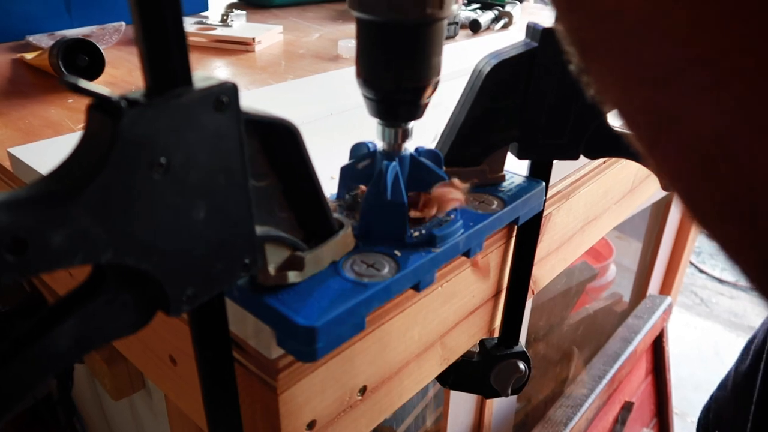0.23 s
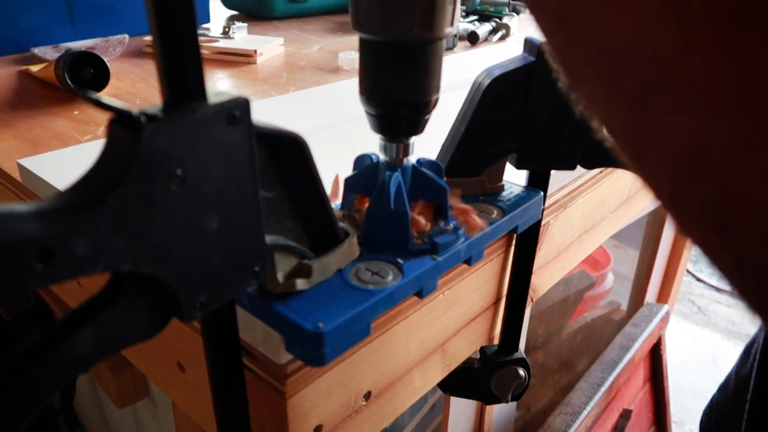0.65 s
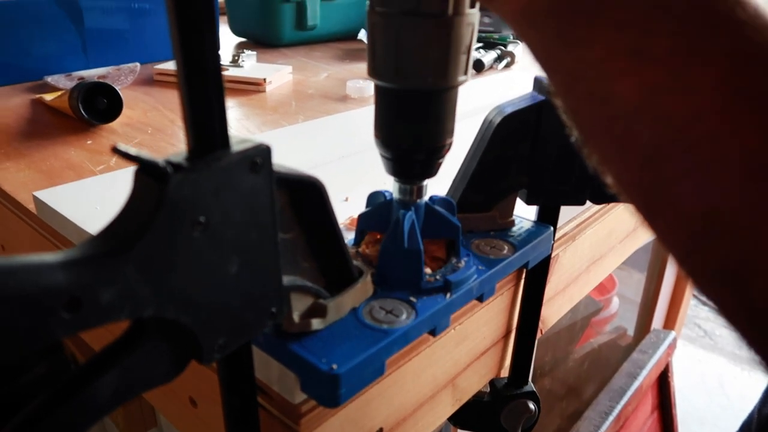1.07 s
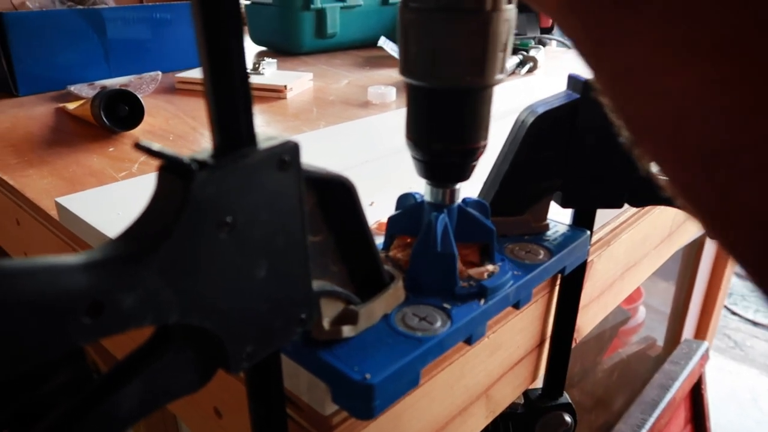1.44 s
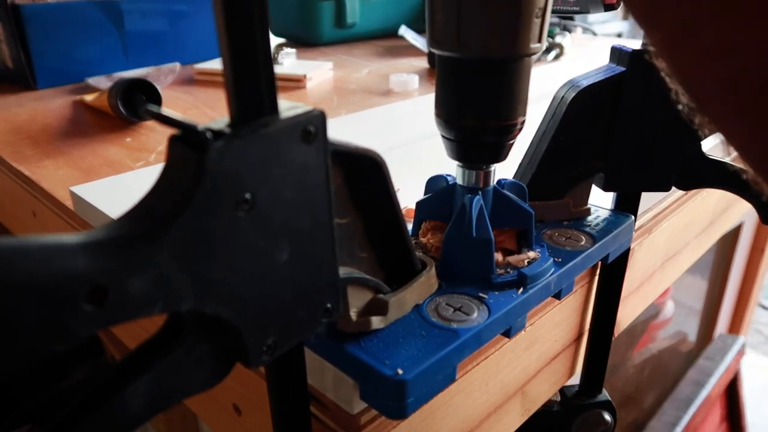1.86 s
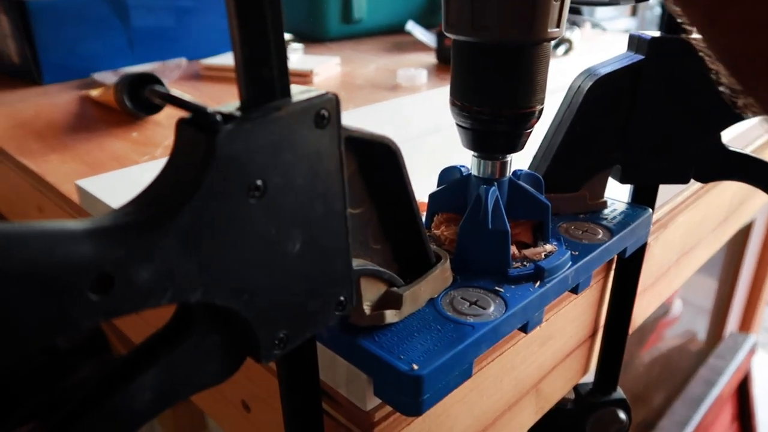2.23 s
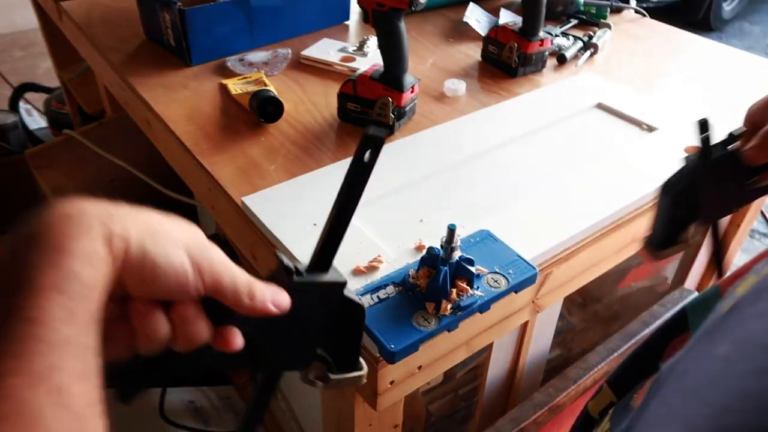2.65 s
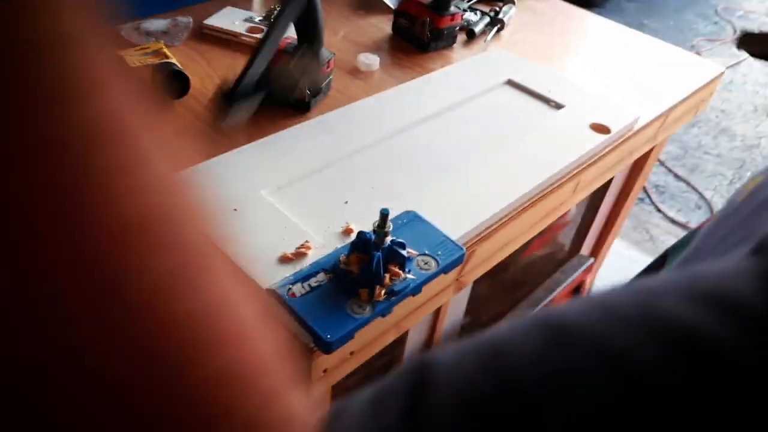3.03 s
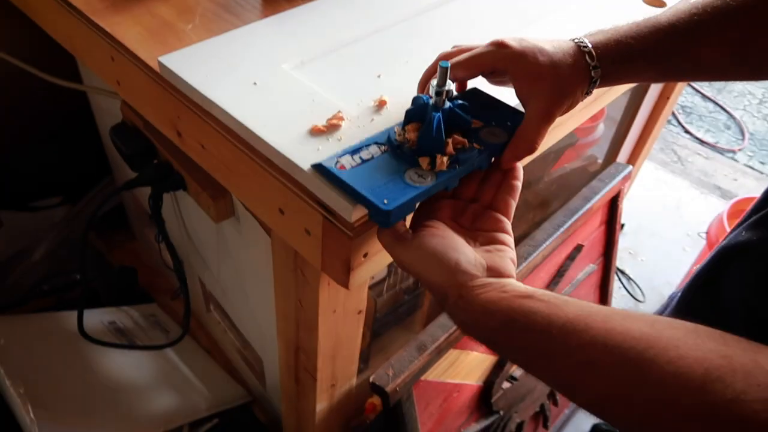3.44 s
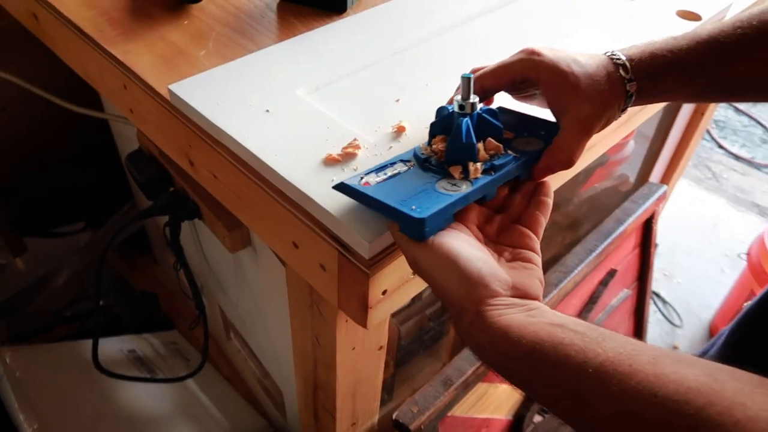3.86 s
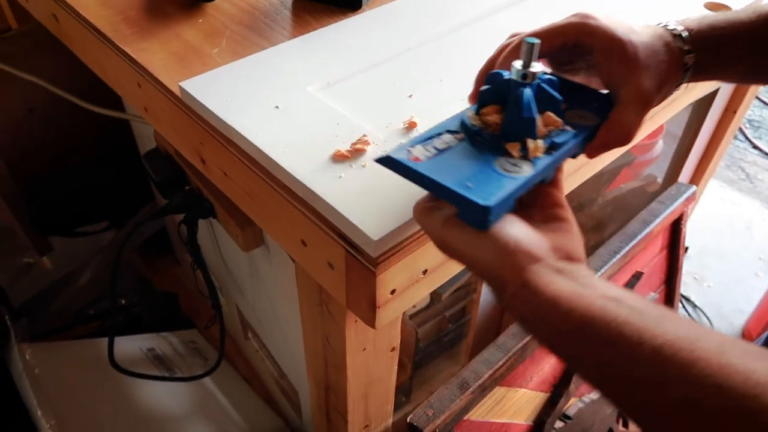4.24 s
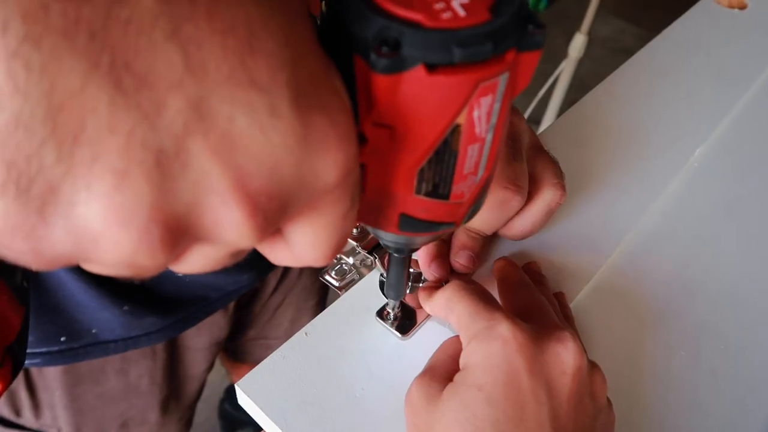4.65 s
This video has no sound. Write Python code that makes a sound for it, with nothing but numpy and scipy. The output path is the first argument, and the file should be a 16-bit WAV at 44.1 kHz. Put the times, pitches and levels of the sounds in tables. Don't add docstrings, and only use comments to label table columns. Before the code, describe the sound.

Two close microphones hear a steel cutter chirping and crying in wood, its motor whining thinly above a hollow, rough grind. The drill stops abruptly, leaving low room rumble and light hiss. A plastic jig scuffs and knocks as it is lifted from the door. After a pause, bright metal ticks lead into a brief powered screwdriver rattle, ringing and slipping on a hinge screw. Small workshop, very little echo.

```python
import sys
import numpy as np
from scipy import signal
from scipy.fft import rfft, irfft
from scipy.io import wavfile
from scipy.ndimage import uniform_filter1d

SR = 44100
rng = np.random.default_rng(int(sys.argv[2]) if len(sys.argv) > 2 else 0)


def pcm_store(signal):
    levels = np.round(np.clip(np.atleast_2d(signal), -1, 1) * 32767)
    wavfile.write(sys.argv[1], SR, levels.astype(np.int16).T)


def nominal_scale(level):
    x = np.asarray(level, float) / 20
    return 10 ** x


N = 211225

# time in seconds, sag at the gear mesh in Hz, strength of the cry from 0 to 1.
CATCHES = [(.5, 78.2, 0.78), (.567, 110.6, 1), (.675, 104.8, 0.73), (.785, 130.4, 0.5), (.855, 49.5, 0.41),
           (.895, 140, 0.65), (1.012, 109.7, 0.84), (1.122, 99.7, 0.52), (1.228, 88.8, 0.54),
           (1.43, 89.55, 0.65), (1.5, 40.3, 0), (1.553, 139.3, 0.78), (1.615, 94.7, 0.9),
           (1.675, 151, 0.85), (1.735, 49.8, 0.8), (1.85, 50.32, 0.35)]
STOP_S = 2.2425


def evened(x):
    return x / np.sqrt(np.mean(x ** 2) + 1e-20)


def colour(x, points):
    f, db = np.transpose(points)
    hz = np.fft.rfftfreq(len(x), 1 / SR)
    gain = nominal_scale(np.interp(np.log(hz + 1), np.log(f + 1), db))
    return irfft(rfft(x) * gain, len(x))


def dull(x, hz):
    return signal.sosfilt(signal.butter(4, min(hz, .45 * SR), fs=SR, output="sos"), x)


def add(mix, s, sound):
    part = mix[max(round(s * SR), 0):][:len(sound)]
    part += sound[:len(part)]


def curves(rows):
    s, *columns = np.transpose(rows)
    t = np.arange(s[0], s[-1], 1 / SR)
    return s[0], [np.interp(t, s, c) for c in columns]


def wander(n, hz):
    size = int(SR / hz)
    return evened(uniform_filter1d(uniform_filter1d(rng.standard_normal(n), size), size))


def tone(hz):
    return np.sqrt(2) * np.sin(2 * np.pi * np.cumsum(hz) / SR)


def resonate(x, hz, width):
    turn = np.exp(2j * np.pi * np.cumsum(hz * np.ones(len(x))) / SR)
    r = np.exp(-np.pi * width / SR)
    return 2 * (turn * signal.lfilter([1 - r], [1, -r], x / turn + 1e-18)).real


def band(x, hz, width):
    return resonate(resonate(x, hz, width), hz, width)


def body(x, modes, drift=0., swell_db=0.):
    n, total = len(x), 0
    for k, (hz, width, db) in enumerate(modes):
        gain = (-1) ** k * nominal_scale(db + swell_db * wander(n, 5.3))
        total = total + gain * band(x, hz * (1 + drift * wander(n, 8.9)), 1.395 * width)
    return evened(total)


def chips(n, per_s, spread_db, share, flutter_db):
    size = nominal_scale(spread_db * np.minimum(rng.exponential(1, n), 4))
    snaps = size * (rng.random(n) < per_s / SR) * rng.choice([-1, 1], n)
    drive = rng.standard_normal(n) + share * evened(snaps)
    return evened(drive * nominal_scale(flutter_db * wander(n, 88)))


def spread(mid, wide, t60):
    t = np.arange(8000) / SR
    tail = rng.standard_normal(8000) * nominal_scale(-60 * t / t60)
    side = colour(signal.oaconvolve(mid, tail / np.linalg.norm(tail))[:N], wide)
    return np.array([mid + side, mid - side])


def air():
    # frequency in Hz, dB per Hz.
    rumble_shape = [(15, -45), (25, -37), (49, 2), (82, -12.5), (113, 5), (156, -6.5), (209, -12),
                    (234, -9.5), (293, -9.5), (500, -16.5), (1200, -25), (1560, -58), (2640, -120)]
    swish_shape = [(290, -25), (500, -3), (608, -11), (750, -11), (826, -8.5), (1390, -5.5), (1590, -10),
                   (2260, -11), (2420, -9.5), (3840, -6.5), (6080, -22), (10500, -31), (12300, -25),
                   (13800, -36)]
    still_shape = [(290, -37.5), (500, -13), (722, -7), (851, -15), (1090, -14), (1490, -9.5), (9000, -29),
                   (13000, -42.5)]
    # frequency in Hz, width in Hz, level in dB.
    hum_modes = [
        (109.7, 26, -67),
        (201.3, 15.4, -61),
    ]
    t = np.arange(2.3, N / SR, 1 / SR)
    n = len(t)
    opened = np.clip((t - 2.414) / 0.091, 0, 1)
    late_rise = np.clip((t - 4.39) / 0.0345, 0, 1)
    room_db = -10.5 * (1 - opened) + 5 * late_rise
    slide = opened * np.clip(1 - (t - 2.64) / 0.37, 0, 1)
    lull = np.clip(1 - abs(t - 4.3) / 0.22, 0, 1)
    rumble_db = -52 + room_db + 2.2 * slide - 3 * lull
    hiss_db = -68 + .6 * room_db + 9.5 * slide
    rumble = evened(colour(rng.standard_normal(n), rumble_shape)) * nominal_scale(1.3 * wander(n, 15))
    drone = sum(nominal_scale(db + 55.5) * evened(band(rng.standard_normal(n), hz, w)) for hz, w, db in hum_modes)
    swish = np.clip((3.05 - t) / 0.12, 0, 1)
    still = evened(colour(rng.standard_normal(n), still_shape))
    sliding = evened(colour(rng.standard_normal(n), swish_shape))
    hiss = np.sqrt(swish) * sliding + np.sqrt(1 - swish) * still
    return t[0], nominal_scale(rumble_db) * evened(rumble + drone) + nominal_scale(hiss_db) * hiss


def drag(s, hold, fall, rub_db, thud_db, modes):
    # frequency in Hz, dB per Hz.
    rub_shape = [(350, -38.5), (600, 7), (930, 1), (1070, -16.5), (1170, -9), (1420, 1.5), (1660, 3.5),
                 (2540, -8), (2980, -12), (3930, -12), (5120, -22), (6180, -20), (12000, -28), (15600, -65),
                 (22000, -120)]
    t = np.arange(0, .3, 1 / SR)
    rise_s = .012
    stroke = np.minimum(t / rise_s, 1) ** 2 * nominal_scale(-20 * np.maximum(t - rise_s - hold, 0) / fall)
    rub, grit = (chips(len(t), per_s=500., spread_db=3., share=0.58, flutter_db=2.2) for _ in range(2))
    thud = body(rub, [(227, 143, 10), (366, 190, -9)])
    plastic = evened(1.4 * body(rub, modes, drift=.04) + evened(colour(grit, rub_shape)))
    return s, stroke * (nominal_scale(rub_db) * plastic + nominal_scale(thud_db) * thud)


def knock(s, db, hz, t60):
    # frequency in Hz, width in Hz, level in dB.
    jig_modes = [(750, 435, 5.5), (1460, 370, 11), (2300, 630, -3), (3300, 380, -5), (4510, 900, -21)]
    t = np.arange(4096) / SR
    blow = rng.standard_normal(4096) * nominal_scale(-60 * t / .004)
    shudder = rng.standard_normal(4096) * nominal_scale(-60 * t / t60)
    sound = dull(body(blow, jig_modes) + 0.82 * evened(band(shudder, hz, 400)), 6000)
    return s, nominal_scale(db) * sound / abs(sound).max()


def tick(s, db, hz, top_db, t60):
    t = np.arange(4096) / SR
    snap = rng.standard_normal(4096) * (nominal_scale(-60 * t / t60) + nominal_scale(-28.0 - 60 * t / 0.24))
    core = evened(band(snap, hz, 1800)) + .66 * evened(band(snap, 6500, 3500))
    core = dull(core + nominal_scale(db + 1.0) * evened(band(snap, 1500, 840)), 10600)
    sound = core + nominal_scale(top_db) * dull(evened(band(snap, 10570, 2000)), 13000)
    sound = signal.sosfilt(signal.butter(3, .5 * hz, "high", fs=SR, output="sos"), sound)
    return s, nominal_scale(db) * sound / abs(core).max()


def sing(s, length, start_hz, end_hz, db):
    n = int(length * SR)
    hz = np.linspace(start_hz, end_hz, n) * (1 + 0.011 * wander(n, 150))
    return s, nominal_scale(db + 2.2 * wander(n, 200)) * tone(hz) * signal.windows.tukey(n, .4)


def crack():
    t = np.arange(600) / SR
    tip_hz, hinge_hz, plunge_s, t60 = 6000, 1500, .0007, .014
    hz = hinge_hz + (tip_hz - hinge_hz) * np.exp(-t / plunge_s)
    level = nominal_scale(-11 - 3 - 60 * (t / t60) ** 1.4)
    return 4.6468, level * np.minimum(t / .0007, 1) * tone(hz)


def driver():
    # time in seconds, ring level in dB.
    grip_curve = [(4.5, -68), (4.538, -31), (4.55, -34.5), (4.6, -24.5), (4.64, -35.5), (4.648, -25),
                  (4.728, -29.5), (4.746, -21.5), (4.79, -31.5)]
    # dB at the usual grip, share of the grip followed (dB per dB).
    layers = [
        (-36, 0.22),
        (-32, 0.52),
        (-36.5, 0.44),
        (-46.5, .1),
    ]
    # frequency in Hz, width in Hz, level in dB.
    panel_modes = [(118.3, 32, -4.5), (155, 39, -9), (221, 21.6, -3), (321, 120, -11), (621, 46, -12.5),
                   (796, 90, -21)]
    hinge_modes = [(920, 89, -20), (1250, 81, -7), (1355, 40, -8.5), (1478, 45, -2.5), (1585, 86, -4.5),
                   (1800, 200, -21), (2050, 37, -16)]
    # frequency in Hz, dB per Hz.
    rattle_shape = [(1120, -37), (1900, 7), (1990, -27), (2140, -1.5), (2780, 4), (4040, -3.5), (4380, -10),
                    (4800, -19.5), (5200, -29.5), (6760, -41), (11400, -120)]
    hiss_shape = [(2650, -32.5), (4500, -11), (4810, -1.5), (5220, -7.5), (7150, -14), (8010, -9),
                  (9110, -16), (11600, -20.5), (14100, -36.5)]
    s, (grip_db,) = curves(grip_curve)
    n = len(grip_db)
    t = s + np.arange(n) / SR
    usual_grip_db = -28.5
    hum_db, ring_db, rattle_db, hiss_db = (db + share * (grip_db - usual_grip_db) for db, share in layers)
    spin = np.clip((t - 4.512) / 0.026, 0, 1) ** 2
    speed = 1 - np.exp(-np.maximum(t - 4.535, 0) / .04)
    rotor_hz = 170 + (204 - 170) * speed + 7 * wander(n, 40)
    rotor = nominal_scale(-33.5 + 1.8 * wander(n, 60)) * tone(rotor_hz)
    grip = chips(n, per_s=900., spread_db=2.5, share=0.568, flutter_db=1.5)
    slip = np.min([np.clip(abs(t - at) / 0.006, .15, 1) for at in (4.582, 4.625, 4.673, 4.711)], axis=0)
    hum = slip * speed * (nominal_scale(hum_db) * body(grip, panel_modes) + rotor)
    ring = nominal_scale(ring_db) * body(grip, hinge_modes)
    rattle = nominal_scale(rattle_db) * evened(colour(grip, rattle_shape))
    hiss = nominal_scale(hiss_db) * evened(colour(grip, hiss_shape))
    return s, hum + spin * (ring + rattle + hiss)


def whistle(start, end, hz, db, waver):
    n = int((end - start) * SR)
    i = np.arange(n)
    whine = tone(hz + waver * wander(n, 14))
    fade_in = np.minimum(i / (150 + n * n / 400000), 1)
    fade_out = np.minimum(i[::-1] / 150, 1)
    return start, nominal_scale(db + 1.4 * wander(n, 25)) * whine * fade_in * fade_out


def mesh():
    # time in seconds, frequency in Hz.
    speed_curve = [(0, 8223), (.45, 8400), (.7, 8440), (1.0, 8500), (1.3, 8490), (1.6, 8423), (1.75, 8430),
                   (1.95, 8594), (2.15, 8670), (2.235, 8634)]
    s, (hz,) = curves(speed_curve)
    n = len(hz)
    t = s + np.arange(n) / SR
    sag = sum(depth * np.exp(-abs(t - at) / 0.01) for at, depth, cry in CATCHES)
    hz = hz - sag + 10 * wander(n, 82.97)
    db = -53 - 12 * np.clip((.75 - t) / .35, 0, 3) + 2.2 * wander(n, 14)
    mirror_db = -59 - 2.8 * t + 3.9 * wander(n, 25)
    switch_hz = 7860
    mirror_hz = 2 * switch_hz - hz + 25 * wander(n, 90.2)
    both = nominal_scale(db) * tone(hz) + nominal_scale(mirror_db) * tone(mirror_hz)
    return s, both * signal.windows.tukey(n, .02)


def jig_ring():
    n = int(STOP_S * SR)
    arch = np.sqrt(np.sin(np.pi * np.clip(np.arange(n) / (1.02 * n), 0, 1)) + 1e-9)
    drive = chips(n, per_s=1500., spread_db=1.5, share=0.48, flutter_db=3.5)
    hz = 1365 + 25 * arch + 18 * wander(n, 17)
    return 0, nominal_scale(-52.5 + 11.5 * arch + wander(n, 20)) * evened(band(drive, hz, 90))


def squeal(s, length, start_hz, end_hz, db, arch_hz=0):
    n = int((length + .012) * SR)
    flutter_hz = np.interp(db, [-34, -29], [16, 55])
    arch = arch_hz * np.sin(np.linspace(0, np.pi, n))
    hz = np.linspace(start_hz, end_hz, n) + arch + flutter_hz * wander(n, 280)
    rough = np.interp(db, [-34, -28], [0, .4])
    rasp = body(rng.standard_normal(n), [(hz, 300, 0), (1.16 * hz, 420, -8), (0.902 * hz, 300, -5)])
    cry = np.sqrt(1 - rough) * tone(hz) + np.sqrt(rough) * evened(rasp)
    fade = signal.windows.tukey(n, min(0.01986 * SR / n, 1))
    return s - .006, nominal_scale(db + 1.4 * wander(n, 120)) * cry * fade


def bite(s, length, start_hz, end_hz, db):
    return squeal(s, length, start_hz, end_hz, db, arch_hz=1913 * length)


def glide():
    # time in seconds, frequency in Hz, level in dB.
    song = [(1.865, 2453, -44), (1.888, 2587, -32), (1.936, 2544, -35), (1.98, 2770, -38),
            (2.03, 2717, -38), (2.062, 2824, -35), (2.126, 2855, -36), (2.15, 2900, -47)]
    s, (hz, db) = curves(song)
    n = len(hz)
    return s, nominal_scale(db + wander(n, 60)) * tone(uniform_filter1d(hz, size=400) + 12 * wander(n, 200))


def load(t):
    peaks = [min(sag / 100, 1.35) * np.clip(1 - abs(t - at) / .024, 0, 1) for at, sag, cry in CATCHES]
    return np.max(peaks, axis=0)


def rim():
    t = np.arange(0, STOP_S, 1 / SR)
    n = len(t)
    dip = uniform_filter1d(load(t), size=300)
    ring = np.max([cry * np.clip(4 * (1 - abs(t - at) / .033), 0, 1) for at, sag, cry in CATCHES], axis=0)
    low = nominal_scale(-30.5 + 2.2 * wander(n, 70)) * tone(2660 - 500 * dip + 36 * wander(n, 130))
    high = nominal_scale(-42 + 4.5 * wander(n, 45)) * tone(3650 - 500 * dip + 70 * wander(n, 90))
    choke = np.clip(1 - 5 * (dip - .85), 0, 1)
    return 0, ring * (low * choke + high)


def drill():
    # time in seconds, cutting level in dB.
    feed = [(0.0, -18.5), (0.06, -25.5), (0.09, -22.5), (0.12, -23), (0.87, -27.5), (0.89, -26), (1.2, -29),
            (1.66, -25.5), (2.25, -27.5)]
    # dB at the usual push, share of the push followed (dB per dB),
    # dB added once the bit runs free, lumps in dB, dying in dB per second.
    layers = [
        (-32, 0.45, -3, 0.32, 127.5),
        (-36.5, 0.13, -1.5, 0.5, 267),
        (-30, 0.9, 0.9, 0.73, 319),
        (-39.5, 0.55, 0, 0.16, 521.5),
    ]
    # Hz, width in Hz, level in dB.
    panel_modes = [(170, 15.8, -4.5), (219, 43, -7), (293.3, 36, -6), (348, 25.6, -0.5), (433, 68, -8),
                   (500, 62, -2), (571.6, 63, -1.5), (660, 27.5, -2.5), (738, 35, -10.5)]
    fibre_modes = [(749, 106, -1.5), (978, 135, -2), (1206, 183.5, -5.5), (1500, 250, -6.5),
                   (1794, 160, -7)]
    # frequency in Hz, dB per Hz.
    scrape_shape = [(1000, -61), (1700, -17.5), (1980, -11), (2310, -5), (2590, -4.5), (2980, -6),
                    (3470, -7.5), (4590, -20), (5000, -26), (6500, -32), (11000, -120)]
    motor_shape = [(2240, -23.5), (3800, -4.5), (4830, -8), (6220, -7.5), (7570, -17), (8220, -17),
                   (8690, -17.5), (9020, -20), (11700, -25), (13000, -30.5), (14100, -40.5)]
    usual_push_db, silent_s = -26.5, 2.39
    s, (push_db,) = curves(feed + [(silent_s, feed[-1][1])])
    n = len(push_db)
    t = s + np.arange(n) / SR
    freed = np.clip((t - 1.79) / .25, 0, 1)
    stop_drop_db = 4.5 * np.clip((t - STOP_S) / 0.008, 0, 1)
    levels = []
    for db, share, free_db, lump_db, dying in layers:
        level = db + share * (push_db - usual_push_db) + free_db * freed + lump_db * wander(n, 25)
        levels.append(level - dying * np.maximum(t - STOP_S, 0) - stop_drop_db)
    shake_db, grind_db, scrape_db, hiss_db = levels

    cut = chips(n, per_s=1500., spread_db=2.0, share=0.72, flutter_db=1.0)
    strays = 0
    for hz in (2700, 3100, 3500, 4000):
        chirp = evened(band(cut, hz + 260 * wander(n, 70), 140))
        strays = strays + chirp * nominal_scale(3.8 * wander(n, 60))
    stray_share = .45 * np.clip((2 - t) / .3, .2, 1)
    scrape = evened(evened(colour(cut, scrape_shape)) + stray_share * evened(colour(strays, scrape_shape)))
    hiss = evened(colour(chips(n, per_s=1700.0, spread_db=4.0, share=0.59, flutter_db=1.03), motor_shape))

    panel = body(cut, panel_modes, drift=.008, swell_db=.6)
    panel = panel + nominal_scale(-19.5 - 10 * freed) * evened(band(cut, 104, 28))
    after = np.clip((t - 2.255) / 0.095, 0, 1)
    panel = (1 - after) * panel + after * 0.82 * evened(dull(panel, 287))
    panel = panel * np.clip((silent_s - t) / 0.056, 0, 1) ** 2
    fibre_drive = chips(n, per_s=1500., spread_db=2., share=.7, flutter_db=1.)
    fibres = body(fibre_drive, fibre_modes, drift=.012, swell_db=1.3)
    wood = nominal_scale(shake_db) * panel + nominal_scale(grind_db) * fibres
    return s, wood + nominal_scale(scrape_db - 2.0) * scrape + nominal_scale(hiss_db) * hiss


def scene():
    # start in
    # seconds, length in seconds, start Hz, end Hz, level in dB.
    bites = [(0, 0.047, 2408, 2633, -25.5), (0.069, 0.029, 2210, 2300, -33.5),
             (0.046, 0.028, 2760, 2490, -26), (.088, 0.0206, 3110, 3060, -32.5),
             (0.114, 0.048, 2680, 2470, -25.5), (.16, 0.0303, 2350, 2140, -33),
             (0.185, 0.044, 2694, 2416, -27), (0.235, 0.021, 2340, 2340, -28.5),
             (0.237, 0.0334, 3320, 3000, -33.5), (0.269, 0.057, 2597, 2506, -24.5),
             (0.325, 0.046, 2850, 3100, -35), (0.36, 0.02, 2660, 2320, -26),
             (0.383, 0.034, 2520, 2310, -29), (0.389, 0.042, 3630, 3140, -35.5),
             (0.423, 0.027, 2644, 2430, -29.5), (0.443, 0.055, 3300, 2990, -36.5),
             (.456, .036, 2400, 2287, -32.5)]
    squeals = [(0.611, 0.053, 2766, 2734, -35.5), (.67, 0.12, 2276, 2352, -42),
               (0.732, 0.036, 2917, 2920, -44), (0.939, 0.0289, 2693, 2500, -33.5),
               (0.951, 0.0246, 3522, 3670, -34.5), (1.063, 0.034, 2636, 2696, -36),
               (1.159, 0.039, 2363, 2362, -36.5), (1.26, 0.11, 2443, 2355, -35.5),
               (1.76, 0.084, 2599, 3050, -39), (1.809, .06, 2300, 2396, -39.5), (.81, .04, 2800, 2810, -39),
               (.54, .025, 3400, 3680, -35), (.77, 0.041, 3380, 3480, -38.5),
               (1.32, 0.071, 2920, 2980, -40.5), (1.4, 0.047, 2300, 2356, -38),
               (1.665, 0.02, 2694, 2760, -33.5), (1.67, .02, 3010, 2995, -36),
               (1.47, 0.034, 2696, 2770, -40.5), (2.001, 0.043, 1770, 1800, -39.5),
               (2.163, 0.02, 1800, 1700, -35), (1.92, 0.049, 3120, 3240, -39), (2, .03, 3450, 3540, -38),
               (2.269, 0.077, 2635, 2900, -74), (2.364, .056, 2936, 2900, -79),
               (1.15, 0.064, 3910, 4020, -42.5), (1.24, 0.18, 4100, 3980, -45),
               (1.742, 0.076, 3570, 4230, -46)]
    sings = [(4.529, .025, 1450, 1490, -38), (4.56, 0.023, 1670, 1600, -34),
             (4.578, 0.052, 1450, 1470, -27), (4.556, .025, 760, 740, -41.5),
             (4.58, 0.034, 1130, 1232, -36.5), (4.661, 0.0128, 1595, 1608, -26),
             (4.672, 0.024, 1486, 1450, -31.5), (4.699, .02, 1560, 1598, -36),
             (4.733, 0.067, 1562, 1510, -24.5), (4.728, .035, 1268, 1244, -33.5)]
    throbs = [(0, 0.012, 473, 560, -28.5), (.012, .03, 526, 502, -27.5), (.105, .035, 529, 500, -30.5),
              (.155, 0.021, 524, 520, -31), (.235, 0.029, 500, 550, -25), (.325, 0.036, 524, 576, -28.5),
              (.395, .025, 538, 540, -30.5), (.47, .09, 663, 663, -32.5), (.56, 0.031, 538, 570, -25),
              (.64, 0.023, 560, 564, -34), (.675, 0.019, 549, 530, -33), (1.085, .025, 530, 540, -33.5),
              (2.03, .025, 515, 530, -34.5), (2.07, 0.024, 560, 560, -35), (.74, 0.049, 500, 553, -34),
              (.74, 0.048, 345, 348, -35), (.9, 0.062, 566, 534, -34), (.965, 0.044, 528, 558, -32.5),
              (1.195, .03, 505, 540, -31.5), (1.3, 0.024, 577, 578, -37.5), (1.345, 0.032, 517, 554, -29.5),
              (1.46, 0.029, 560, 517, -29), (1.56, 0.037, 567, 535, -35), (1.68, 0.029, 570, 573, -35),
              (1.73, 0.042, 671, 650, -38), (1.76, 0.028, 506, 518, -35), (1.99, 0.058, 166, 177, -41),
              (2.26, 0.078, 170, 164, -51), (1.33, 0.045, 1500, 1540, -40.5),
              (1.16, 0.056, 1510, 1500, -46), (.9, .04, 1197, 1190, -37), (0, 0.054, 1349, 1374, -39)]
    # start in seconds, end in seconds, Hz, level in dB, waver in Hz.
    whistles = [
        (.45, 2.23, 7927, -55.5, 2),
        (4.508, 4.79, 7990, -59, 3),
        (4.665, 4.79, 7728, -50, 5),
    ]
    # start in seconds, hold in seconds, fall in seconds per 20 dB,
    # rub in dB, thud in dB.
    drags = [
        (3.272, .075, .05, -54, -54),
        (3.466, .036, .012, -54, -64),
        (3.61, .022, .015, -65, -72),
        (3.698, .015, .11, -57.5, -59),
        (3.79, .02, .1, -55.5, -60),
        (3.368, .035, .03, -66, -46),
    ]
    # Hz, width in Hz, level in dB.
    jig_modes = [
        [(1100, 200, -4), (1440, 250, 0), (1880, 250, -1), (2950, 450, -1), (4050, 400, -10), (5200, 900, -15)],
        [(1620, 110, 0), (2900, 300, -19), (3600, 450, -14)],
        [(1700, 500, 0), (3500, 500, -4)],
        [(1400, 400, 0), (700, 300, -2), (1900, 400, -1), (3400, 500, -8)],
    ]
    # time in seconds, peak in dB, ring in Hz, decay (t60) in seconds.
    knocks = [(2.3954, -61, 2880, 0.048), (3.2815, -46, 1700, 0.048), (3.376, -48, 2900, 0.025),
              (3.717, -55, 1500, .04), (3.73, -57, 3400, .03), (3.479, -48, 1620, 0.09),
              (3.708, -54, 1888, 0.05), (3.7805, -28, 1890, 0.038), (3.7855, -28.5, 1440, 0.076),
              (3.798, -42, 1500, 0.065), (3.912, -42, 1837, 0.05), (4.3393, -47, 1890, 0.046)]
    # time in seconds, peak in dB, centre in Hz,
    # top over 8 kHz in dB, decay (t60) in seconds.
    ticks = [(2.4264, -52.5, 2600, -12.5, 0.0075), (3.367, -55, 8000, -2, .012),
             (4.4492, -23.5, 4680, -25, 0.0096), (4.451, -31.5, 5660, -25, 0.0121),
             (4.5182, -29.5, 2830, -23.5, 0.0084), (4.528, -41.5, 2680, -3, 0.012),
             (4.5553, -22, 3800, -1.5, 0.009), (4.5655, -39, 3200, -25, .008), (4.57, -36, 3000, -25, .008),
             (4.5339, -33.5, 2750, -24.5, .008), (4.647, -12, 4340, -10, 0.0084)]
    # frequency in Hz, side minus mid in dB.
    near_width = [(25, -25.5), (60, -37.5), (110, -49.5), (200, -39), (370, -24), (670, -21), (1220, -22.5),
                  (2230, -15.5), (4080, -11.5), (7450, -6.5), (13600, -0.5)]
    air_width = [(25, -25), (60, -36), (110, -37.5), (200, -21), (370, -7.5), (670, -9.5), (1220, -4.5),
                 (2230, -3), (4080, -2), (7450, 2.5), (13600, 5)]
    near = np.zeros(N)
    far = nominal_scale(-95) * rng.standard_normal(N)
    add(far, *air())
    for sound in [driver(), crack(), mesh(), jig_ring(), glide(), rim(), drill()]:
        add(near, *sound)
    for make, rows in [(knock, knocks), (tick, ticks), (sing, sings + throbs), (whistle, whistles),
                       (squeal, squeals), (bite, bites)]:
        for row in rows:
            add(near, *make(*row))
    for row, modes in zip(drags, jig_modes + 2 * jig_modes[-1:]):
        add(near, *drag(*row, modes))
    return spread(near, near_width, t60=0.081) + spread(far, air_width, t60=0.1903)


def roll_off(x):
    return signal.sosfilt(signal.butter(12, 15690, fs=SR, output="sos"), x)


def record(dry):
    return roll_off(dry)


dry = scene()
out = record(dry)
pcm_store(out)
```